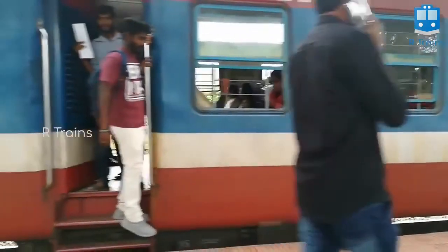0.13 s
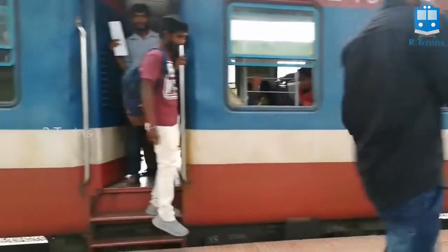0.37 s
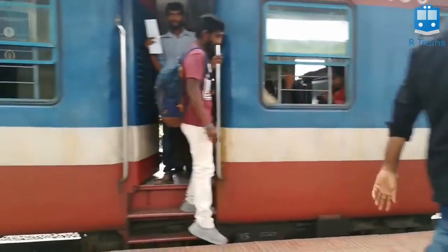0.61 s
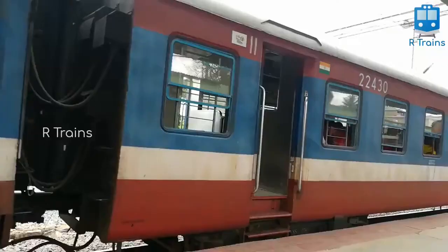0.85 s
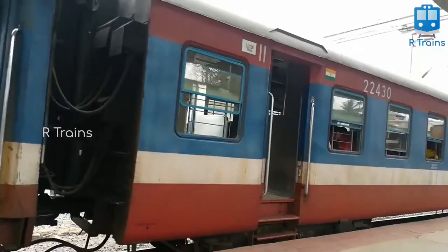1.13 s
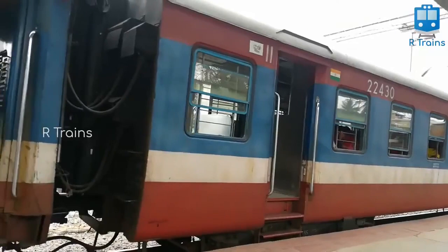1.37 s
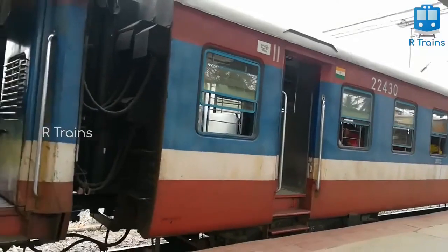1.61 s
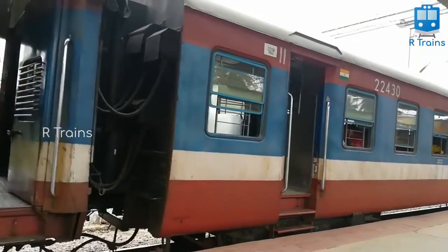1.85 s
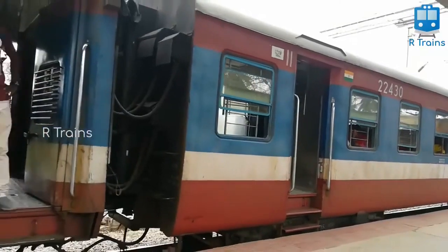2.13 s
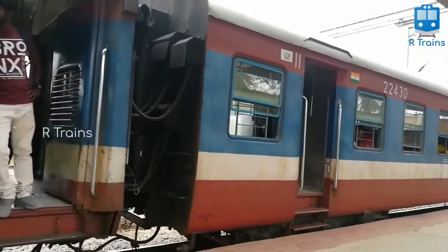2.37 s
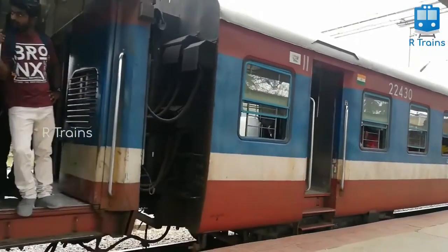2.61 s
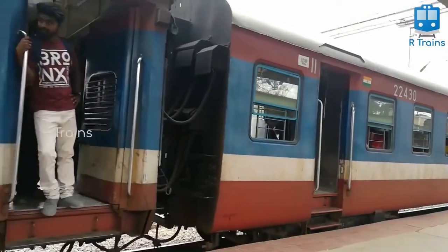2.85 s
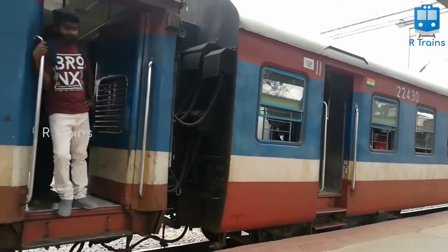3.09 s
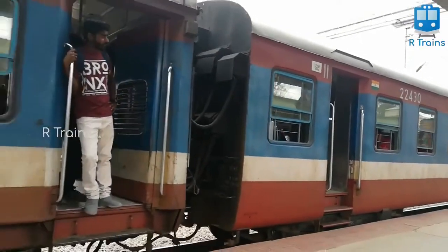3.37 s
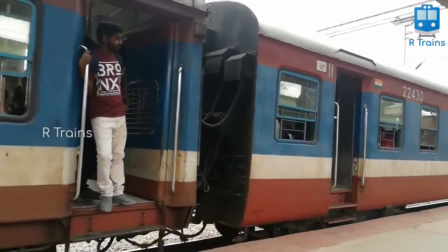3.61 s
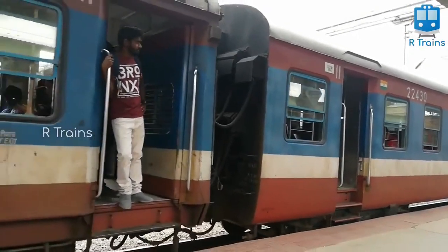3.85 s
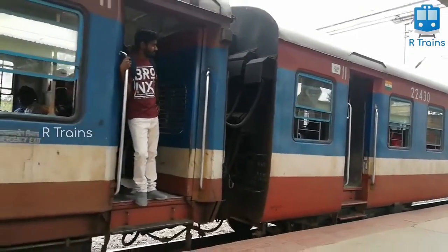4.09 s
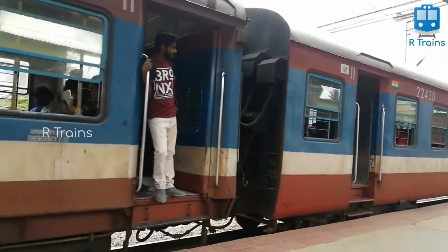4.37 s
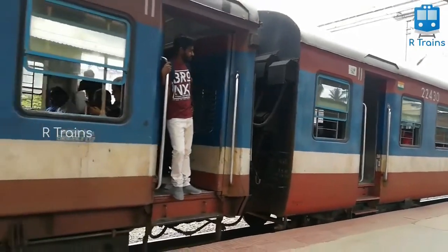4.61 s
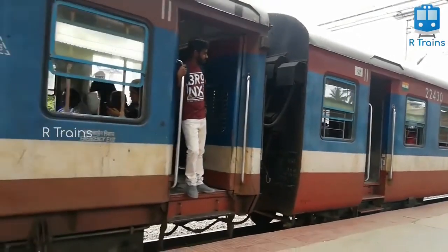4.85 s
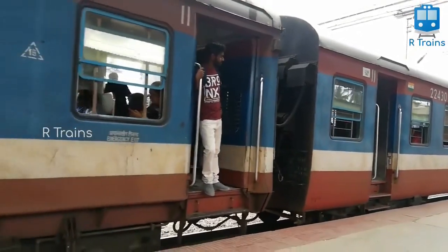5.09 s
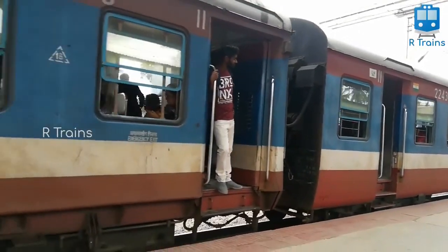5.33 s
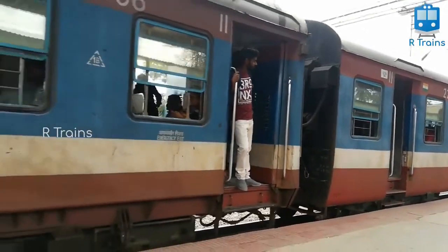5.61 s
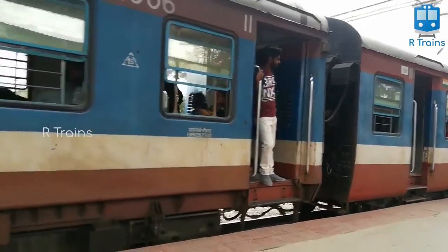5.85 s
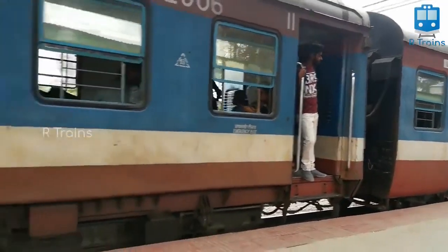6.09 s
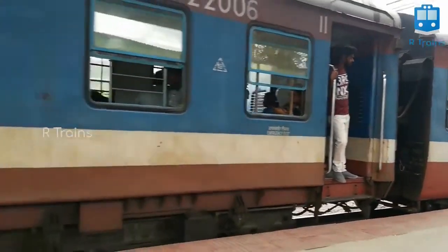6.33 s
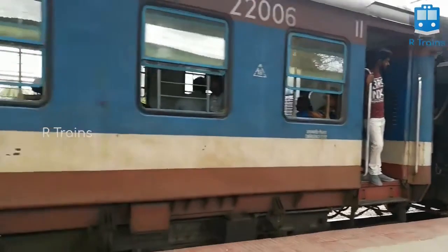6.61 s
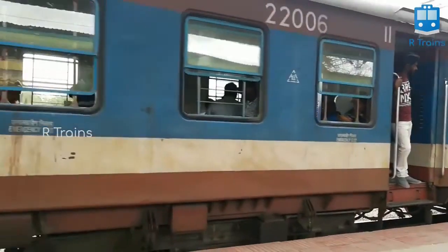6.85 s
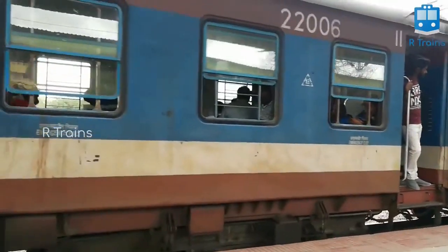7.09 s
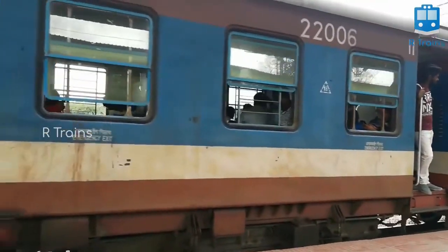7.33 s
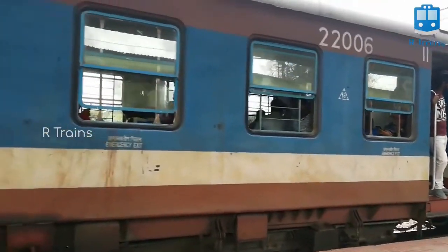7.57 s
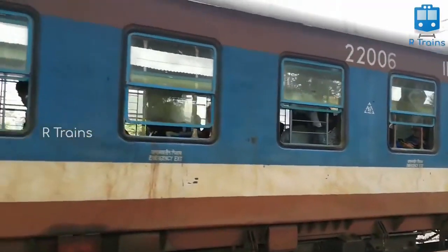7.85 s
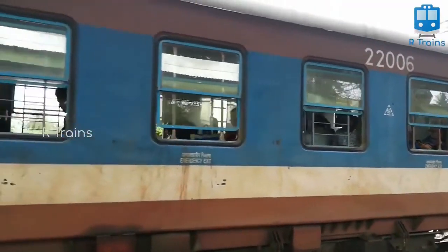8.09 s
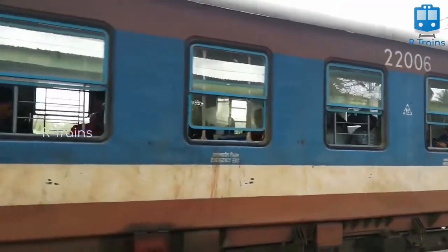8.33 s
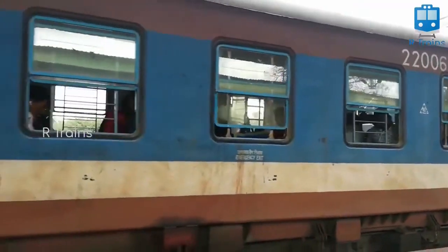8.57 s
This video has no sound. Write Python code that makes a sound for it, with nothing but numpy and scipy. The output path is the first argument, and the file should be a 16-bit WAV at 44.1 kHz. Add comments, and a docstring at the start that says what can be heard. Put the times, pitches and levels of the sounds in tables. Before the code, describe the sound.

Braking train rumbles and hisses with thin squeals and an air puff, brief silence, then a diesel train abruptly rumbles past with throbbing engine and blowers.

```python
"""Diesel train at a platform

A train brakes, heard in stereo: shaped noise rumbles and hisses, wavering sinusoids give the stick-slip
squeal and short tones, and a jet of brake air escapes. After a short silence the train pulls past abruptly.
Filtered noise makes its rolling rumble, engine roar and fan hiss; an engine and two blowers add
sinusoids at multiples of their shaft rates. Sliding tones, clicks and puffs of treble hiss are fainter.
"""
import sys
import numpy as np
from scipy import signal
from scipy.fft import rfft, irfft
from scipy.io import wavfile

SR = 44100
rng = np.random.default_rng(int(sys.argv[2]) if len(sys.argv) > 2 else 0)


def dump(signal):
    """Clip the signal to [-1, 1] and save it as 16-bit WAV at the path in sys.argv[1]."""
    limited = np.clip(np.atleast_2d(signal).T, -1, 1)
    pcm = np.round(limited * 32767).astype(np.int16)
    wavfile.write(sys.argv[1], SR, pcm)


def gain_from_decibels(decibels):
    """Convert decibel values to linear amplitude factors."""
    exponent = np.asarray(decibels, float) / 20
    return 10 ** exponent


N = 384111
T = np.arange(N) / SR   # time, s
HZ = np.maximum(np.fft.rfftfreq(N, 1 / SR), 1)

BRAKING_END_S, PASSING_START_S = 0.7322, 1.0805
ENGINE_HZ, BLOWER_HZ, SECOND_BLOWER_HZ = 24.8, 88.2, 85.4   # shaft turns per second
FIRM_RAD, LINE_WAVER_DB = 0.3, 2.0   # phase and level spread of the steadier hum lines


# Rolling and engine noise over time: time_s, rumble_db, roar_db
PASSING_LEVELS = [(1.09, -36, -34.5), (1.3, -31.5, -32.5), (1.6, -32.5, -34), (2.3, -34, -35),
                  (3.2, -32, -34), (5, -34, -33), (5.8, -29, -33), (7.1, -29.5, -31.5), (8.3, -29.5, -31),
                  (8.71, -30.5, -30.5)]
# Noise spectrum, relative within each layer: frequency_hz, density_db (per Hz)
PASSING_COLOUR = [(12, -35), (20, -0.5), (54, 0.5), (160, -3), (279, -9.5), (405, -14.5), (709, -13),
                  (1080, -15.5), (1240, -13), (1660, -20), (2290, -19.5), (2610, -25.5), (5360, -44.5),
                  (10400, -58), (11600, -58.5), (15100, -100), (22000, -120)]
# Car body resonances: centre_hz, width_hz, lift_db
BODY_RESONANCES = [(240, 113, 3.5), (780, 280, 1.5), (1250, 56, 1), (2200, 600, 2.5), (3590, 1100, 3.5),
                   (5660, 350, 1)]
# Stereo likeness of left and right: frequency_hz, likeness (0-1), left_lead_rad, left_over_right_db
PASSING_STEREO = [(20, 1, 0, -0.5), (201, 0.93, 0.94, 1), (339, 0.98, 2, 2.5), (510, 0.76, 3, 5),
                  (620, 0.91, 3, 8.5), (765, 0.32, 1, 5), (910, 0.12, 1.5, 0.5), (1054, 0.11, 1, 0.5),
                  (1180, 0.19, -7, 5.5), (1676, 0.15, -2.5, 2.5), (1990, 0.18, -5.5, 7),
                  (2390, .06, -2.5, 5), (5000, .05, 0, 5.5), (5170, 0.33, -14, 13.5), (7550, 0.13, -71, 5),
                  (12000, 0.27, 1, 16.5)]


def passing():
    """Superposition: broadband rolling noise adds to the line spectra of three rotating shafts."""
    rumble_db, roar_db = in_time(PASSING_LEVELS)
    swing_db = roar_db - roar_db.mean()
    throb_db, blower_db, whistle_db, whine_db, second_db = hum_levels(swing_db)
    crank = turning(ENGINE_HZ, uneven=0.06)

    # Three firings a turn pulse the roar and hiss faintly; the roar also surges by chance.
    firing_db = 0.4 * np.cos(3 * crank)
    surge_db = 0.5 * drift(12.0)
    hiss_db = -42.0 + 0.83 * swing_db   # follows most of the roar's swing
    levels_db = [rumble_db, roar_db + firing_db + surge_db, hiss_db + firing_db]
    noise = train_noise(PASSING_COLOUR, levels_db, PASSING_STEREO, BODY_RESONANCES,
                        shared_db=0.25, own_db=0.65)

    tones = engine(crank, throb_db) + blower(blower_db, whistle_db, whine_db)
    tones = tones + second_blower(second_db) + slides()
    return noise + stereo(PASSING_STEREO, *tones) + ticks() + treble_swells()


# Engine throb lines: multiple of shaft rate: level_db (relative)
THROB_LINES = {1: -2.5, 2: -0.33, 3: -2.4, 4: -2.4, 5: -6, 8: -5, 12: -8.5}
# Exhaust drone lines: multiple of shaft rate: level_db (relative)
DRONE_LINES = {6: -0.094, 8: -23, 12: -24}
# Exhaust drone over time: time_s, level_db
DRONE_LEVEL = [(1.09, -40.5), (1.5, -31.5), (1.85, -36), (2.2, -44), (2.75, -53), (3.3, -42), (3.7, -37.5),
               (4.15, -31.5), (4.5, -38), (5, -35.5), (5.4, -35.5), (5.8, -38), (6.1, -37), (6.6, -54),
               (7, -43), (7.5, -36.5), (7.9, -35.5), (8.2, -28.5), (8.71, -28.5)]


def engine(crank, throb_db):
    """Harmonic series: engine throb and exhaust drone share multiples of the crank rate."""
    drone_db, = in_time(DRONE_LEVEL)
    throb = hum(crank, THROB_LINES, throb_db, waver_db=1.0, jitter=0.78)
    drone = hum(crank, DRONE_LINES, drone_db, waver_db=2.0, jitter=FIRM_RAD)
    return throb + drone


# Lines of the first blower: multiple of shaft rate: level_db (relative)
BLOWER_LINES = {2: 0.68, 3: -4, 4: -10}
# Its whistle: multiple of shaft rate: level_db (relative)
WHISTLE_LINES = {6: -1.5}
# Its whine: multiple of shaft rate: level_db (relative)
WHINE_LINES = {7: -0.74, 8: -9, 9: -9}


def blower(blower_db, whistle_db, whine_db):
    """Harmonic series: hum, whistle and whine are locked to the angle of one shaft."""
    fan = turning(BLOWER_HZ, uneven=0.06)
    low = hum(fan, BLOWER_LINES, blower_db, waver_db=LINE_WAVER_DB, jitter=0.6)
    whistle = hum(fan, WHISTLE_LINES, whistle_db, waver_db=1.0, jitter=FIRM_RAD)
    whine = hum(fan, WHINE_LINES, whine_db, waver_db=LINE_WAVER_DB, jitter=FIRM_RAD)
    return low + whistle + whine


# Lines of the second blower: multiple of shaft rate: level_db (relative)
SECOND_BLOWER_LINES = {3: -1.6, 6: -12.5, 7: -11.5, 8: -13, 9: -10}


def second_blower(level_db):
    """Detuning: a slightly slower shaft sets its harmonics beside those of the first blower."""
    fan = turning(SECOND_BLOWER_HZ, uneven=0.06)
    return hum(fan, SECOND_BLOWER_LINES, level_db, waver_db=LINE_WAVER_DB, jitter=FIRM_RAD)


# Moments when hums stand out or recede: middle_s, half_length_s,
# throb_lift_db, blower_lift_db, whistle_lift_db, whine_lift_db, second_blower_lift_db
SWELLS = [(1.55, 0.23, 6, 5, 11, 2, 3.5), (2.284, 0.17, 5, 5.5, 6.5, -1, -9),
          (3.102, 0.38, -1.5, 1, 5.5, 0, -1), (4.2, 0.63, 0, 2, -11, 3, -0.5),
          (4.803, 0.84, 0.5, 0, -4, -1, 7), (5.85, 0.3, -9.5, 0.5, 9.5, 3, 0.5),
          (6.602, 0.47, -1.5, 0, 2, 1, -1.5), (7.292, 0.14, -8, 3.5, -3, 8, -2),
          (7.657, 0.28, -2.5, -1, 11, 4.5, -1), (8.4, 0.82, -1.5, 0, -2, -1, 4.5)]


def hum_levels(swing_db):
    """Amplitude modulation: each hum follows the roar, wanders slowly and swells or recedes at times."""
    lifts = sum(np.exp(-((T - middle_s) / half_s) ** 4) * np.array(lift_db)[:, None]
                for middle_s, half_s, *lift_db in SWELLS)
    # Base levels of throb, blower, whistle, whine and second blower, dB.
    base_db = [-40.5, -42.5, -51.5, -47.5, -44.0]
    return [db + 1.98 * swing_db + 0.1 * drift(1.9) + lift for db, lift in zip(base_db, lifts)]


# Braking noise over time: time_s, rumble_db, roar_db, hiss_db
BRAKING_LEVELS = [(0, -32.5, -41, -36), (.06, -35.5, -42, -39), (.15, -36, -40.5, -39.5),
                  (.3, -34, -41, -40), (.42, -34.5, -42.5, -41.5), (.51, -33.5, -43.5, -44.5),
                  (.6, -35, -40.5, -39.5), (.73, -32.5, -43, -36)]
# Noise spectrum, relative within each layer: frequency_hz, density_db (per Hz)
BRAKING_COLOUR = [(12, -36), (20, -1.5), (127, -7.5), (412, -18), (1110, -21), (2110, -19.5), (2680, -26),
                  (2900, -21), (3230, -28.5), (3700, -23), (5100, -32.5), (5830, -35.5), (8940, -53.5),
                  (9690, -50.5), (12000, -62.5), (15600, -106), (22000, -120)]
# Wheel modes that the rubbing brake keeps faintly ringing: centre_hz, width_hz, lift_db
WHEEL_MODES = [(855, 40, -2), (2810, 44, 4.5), (3100, 45, 3.5), (3560, 74, 3.5), (3880, 40, -10),
               (4130, 30, 7), (4760, 25, 5), (5900, 160, 5), (6130, 40, 8)]
# Stereo likeness of left and right: frequency_hz, likeness (0-1), left_lead_rad, left_over_right_db
BRAKING_STEREO = [(20, 1, -1, 0.5), (200, .93, 1, -0.5), (350, 0.58, 0.9, 0.5), (543, 0.1, 3.5, 6.5),
                  (1000, 0, -8, -1.5), (1300, 0.5, -2, -1.5), (3300, 0, 0, -3.5), (4200, 0.3, -7, -7),
                  (5530, .15, -6, -7), (5800, 0.9, -18, -5), (12000, .9, -18, 1)]


def braking():
    """Superposition: friction noise coloured by wheel modes, squeal, then a jet of brake air."""
    noise = train_noise(BRAKING_COLOUR, in_time(BRAKING_LEVELS), BRAKING_STEREO, WHEEL_MODES,
                        shared_db=0.4, own_db=0.9)
    return noise + stereo(BRAKING_STEREO, *(squeal() + brake_air()))


# Squeals and short tones by pitch; the squeal near 2840 Hz rises, 2480 Hz sounds with the air.
# pitch_hz: [(plateau_start_s, held_s, level_db), ..]
SQUEALS = {3093: [(.132, .018, -46.5), (.161, 0.015, -27.5), (.2, 0.013, -36.5), (.218, 0.018, -31),
           (.253, .025, -38), (.288, .012, -44), (.33, .02, -52), (.385, .015, -53.5)],
           2821: [(0, .02, -45), (.265, 0.059, -46), (.33, 0.055, -51), (.382, 0.028, -36.5),
           (.42, 0.079, -50), (.5, 0.05, -51.5)], 2851: [(.46, 0.055, -46), (.522, .025, -37.5),
           (.555, 0.063, -44.5), (.62, .02, -51)], 3630: [(.245, .015, -47.5), (.28, 0.09, -53),
           (.38, .035, -53), (.43, 0.074, -51), (.54, 0.07, -50)], 4088: [(0, 0.049, -45.5),
           (.07, .06, -58)], 848: [(0, 0.092, -46.5)], 2480: [(.645, 0.08, -42.5)],
           3270: [(.68, .035, -50)], 4760: [(.65, .02, -52)], 930: [(.645, .08, -46.5)],
           1320: [(.548, .015, -39)], 692: [(.19, 0.037, -47.5), (.3, .015, -50.5)],
           1180: [(.205, 0.036, -50.5)], 2005: [(.025, .04, -46)], 2060: [(.1, .035, -54), (.17, .06, -51),
           (.345, .012, -46)], 2280: [(.305, .012, -52)], 2150: [(.62, 0.14, -44)]}


def squeal():
    """Stick-slip oscillation: squeal and short tones are wavering sinusoids in bursts with steep edges."""
    total = 0
    for pitch_hz, bursts in SQUEALS.items():
        level = sum(gain_from_decibels(held(*burst, rise=1700.0, fall=1500.0)) for burst in bursts)
        phase = turning(pitch_hz, uneven=0.3)
        total = total + level * wavering(phase, waver_db=0.9, rate=25.0, jitter=0.3)
    return total


# Pass band of the brake air jet: low_hz, high_hz
AIR_BAND = [1900, 4940]


def brake_air():
    """Jet noise: air escaping from a valve is band-passed noise that rises to a steady level."""
    full_s, full_db, rise_db_per_s = 0.68, -60.5, 302
    level = gain_from_decibels(held(full_s, BRAKING_END_S, full_db, rise_db_per_s, fall=0))
    return level * band_noise(AIR_BAND)


# Tones that slide upward: plateau_start_s, held_s, level_db, from_hz, to_hz
SLIDES = [(5.62, 0.33, -43.5, 695, 717), (6.68, .65, -43, 665, 714), (7.62, .3, -50, 766, 770),
          (8.5, .2, -47, 760, 766)]


def slides():
    """Frequency modulation: phase is the running sum of a pitch that rises during the plateau."""
    total = 0
    for start_s, held_s, level_db, from_hz, to_hz in SLIDES:
        pitch_hz = np.interp(T, [start_s, start_s + held_s], [from_hz, to_hz])
        phase = 2 * np.pi * np.cumsum(pitch_hz) / SR
        tone = wavering(phase, waver_db=LINE_WAVER_DB, rate=5.5, jitter=FIRM_RAD)
        total = total + gain_from_decibels(held(start_s, held_s, level_db, rise=120.0, fall=120.0)) * tone
    return total


# Small dry ticks: start_s, level_db (before decay and left/right gains), pitch_hz
TICKS = [(1.204, -47, 8200), (1.2235, -43, 10000), (1.3965, -44, 9500), (1.56, -49, 10000),
         (1.572, -53, 10000), (8.6371, -50, 9000)]


def ticks():
    """Impulse response: each dry click is a sine under a rapid exponential decay, stronger on the left."""
    out, t = np.zeros(N + 200), np.arange(200) / SR
    for start_s, level_db, pitch_hz in TICKS:
        click = np.exp(-t / 0.00053) * np.sin(2 * np.pi * pitch_hz * t)
        out[round(start_s * SR):][:200] += gain_from_decibels(level_db) * click
    return out[:N] * gain_from_decibels(np.array([[1.5], [-8.0]]))   # left, right


# Pass band of the treble puffs: low_hz, high_hz
TREBLE_BAND = [7500, 10700]
# Brief swells of treble hiss: middle_s, half_length_s, level_db (before left/right gains)
TREBLE_SWELLS = [(2.08, .03, -66), (2.44, .03, -63), (4.202, .06, -69), (5.6, 0.093, -67)]


def treble_swells():
    """Gated noise: bell-shaped envelopes cut puffs from high hiss, stronger on the left."""
    hiss = band_noise(TREBLE_BAND)
    level = sum(gain_from_decibels(db) * np.exp(-((T - middle_s) / half_s) ** 2)
                for middle_s, half_s, db in TREBLE_SWELLS)
    return level * hiss * gain_from_decibels(np.array([[3.0], [-3.0]]))   # left, right


# Borders of rumble, roar and hiss: rumble_to_roar_hz, roar_to_hiss_hz
LAYER_EDGES = [350, 1700]


def train_noise(colour, levels_db, stereo_table, resonances, shared_db, own_db):
    """Subband modulation: half-octave bands flicker together and alone in rumble, roar and hiss."""
    hz, db = np.transpose(colour)
    shape_db = np.interp(np.log(HZ), np.log(hz), db)
    for centre_hz, width_hz, lift_db in resonances:
        shape_db = shape_db + lift_db / (1 + (2 * (HZ - centre_hz) / width_hz) ** 2)
    spectrum = gain_from_decibels(shape_db) * rfft(rng.standard_normal((2, N)))
    layers, together = np.zeros((3, 2, N)), drift(2.46)
    for centre_hz in 22 * 2 ** np.arange(0, 9.3, 0.5):
        # Windows of neighbouring bands sum to one.
        window = np.cos(np.pi * np.clip(np.log2(HZ / centre_hz), -0.5, 0.5)) ** 2
        alone_db = own_db * (1 + centre_hz / 8000) * drift(12)   # the treble is patchier
        flicker = gain_from_decibels(shared_db * together + alone_db)
        layers[np.searchsorted(LAYER_EDGES, centre_hz)] += flicker * irfft(spectrum * window, N)
    near, other = sum(gain_from_decibels(db) * layer / np.std(layer) for db, layer in zip(levels_db, layers))
    return stereo(stereo_table, near, other)


def band_noise(band_hz):
    """Linear filtering: white noise through a band-pass, two unrelated signals of joint rms 1."""
    band = signal.butter(2, band_hz, "band", fs=SR, output="sos")
    noise = signal.sosfilt(band, rng.standard_normal((2, N)))
    return noise / np.std(noise)


def hum(angle, multiples, level_db, waver_db, jitter):
    """Fourier series: shaft-locked lines add up; each line's level and phase waver at random."""
    lines = sum(gain_from_decibels(db) * wavering(k * angle, waver_db, rate=3.97, jitter=jitter)
                for k, db in multiples.items())
    return gain_from_decibels(level_db) * lines


def wavering(phase, waver_db, rate, jitter):
    """Random modulation: level and phase waver; a second tone lies a quarter cycle behind; rms 1."""
    phase = phase + jitter * drift(rate)
    pair = gain_from_decibels(waver_db * drift(rate)) * np.array([np.cos(phase), np.sin(phase)])
    return pair / np.std(pair)


def turning(hz, uneven):
    """Phase accumulation: a steady rate with slow wander (rad) and a random starting angle."""
    return 2 * np.pi * hz * T + uneven * drift(2.26) + rng.uniform(0, 2 * np.pi)


def held(start_s, held_s, db, rise, fall):
    """Exponential envelope: level in dB climbs to a plateau and falls at steady rates (dB/s)."""
    return db - rise * np.maximum(start_s - T, 0) - fall * np.maximum(T - start_s - held_s, 0)


def drift(rate):
    """Low-pass random process: two equal poles at rate (Hz) smooth white noise; rms 1."""
    step = 40   # samples between computed values
    pole = np.exp(-2 * np.pi * rate * step / SR)
    white = rng.standard_normal(N // step + 2002)
    slow = signal.lfilter([1], [1, -2 * pole, pole * pole], white)[2000:]   # settled part
    return np.interp(np.arange(N) / step, np.arange(len(slow)), rms_one(slow))


def stereo(table, near, other):
    """Correlation: right is left shifted in phase plus unrelated sound; the mean keeps its colour."""
    hz, *columns = np.transpose(table)
    alike, lead, balance_db = [np.interp(HZ, hz, column) for column in columns]
    alike, right_gain = np.clip(alike, 0, 1), gain_from_decibels(-balance_db)
    left = rfft(near)
    shared = alike * np.exp(-1j * lead) * left
    unrelated = np.sqrt(1 - alike ** 2) * rfft(other)
    right = right_gain * (shared + unrelated)
    mean = np.sqrt(1 + right_gain ** 2 + 2 * right_gain * alike * np.cos(lead)) / 2
    return irfft(np.array([left, right]) / mean, N)


def rms_one(x):
    """Power normalization: the mean of the channels is scaled to rms 1."""
    return x / np.sqrt(np.mean(np.atleast_2d(x).mean(axis=0) ** 2) + 1e-20)


def in_time(rows):
    """Linear interpolation: each column becomes one value per sample."""
    time_s, *columns = np.transpose(rows)
    return [np.interp(T, time_s, column) for column in columns]


def scene():
    """Gating: braking fades out fast; after silence the passing starts abruptly."""
    fade_out = np.clip((BRAKING_END_S - T) / 0.019, 0, 1)
    fade_in = np.clip((T - PASSING_START_S) / 0.0064, 0, 1)
    return braking() * fade_out + passing() * fade_in


def top_cut(x):
    """Nothing passes above the cut-off."""
    return signal.sosfilt(signal.butter(12, 11830, fs=SR, output="sos"), x)


def record(dry):
    """Band limiting: a steep elliptic low-pass removes the top of the spectrum."""
    low_pass = signal.ellip(10, 0.5, 70, 11750, fs=SR, output="sos")   # ripple dB, stop dB, edge Hz
    mix = signal.sosfilt(low_pass, dry)
    return top_cut(mix)


dry = scene()
out = record(dry)
dump(out)
```